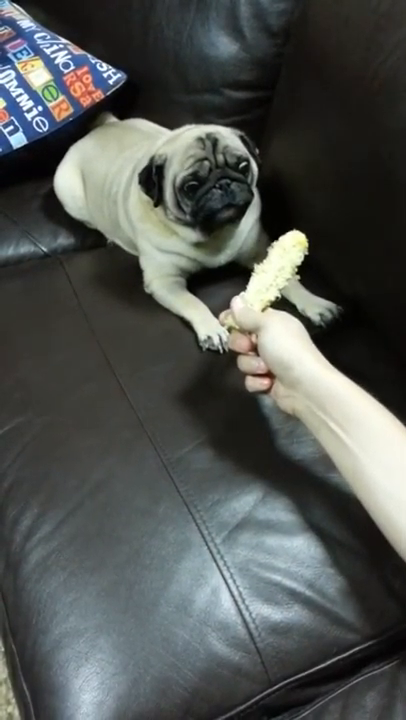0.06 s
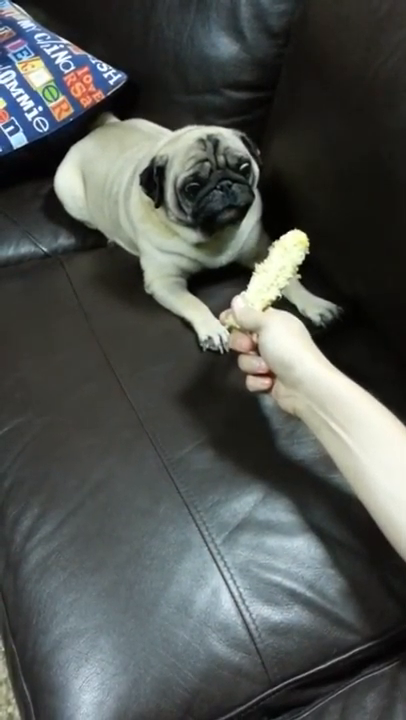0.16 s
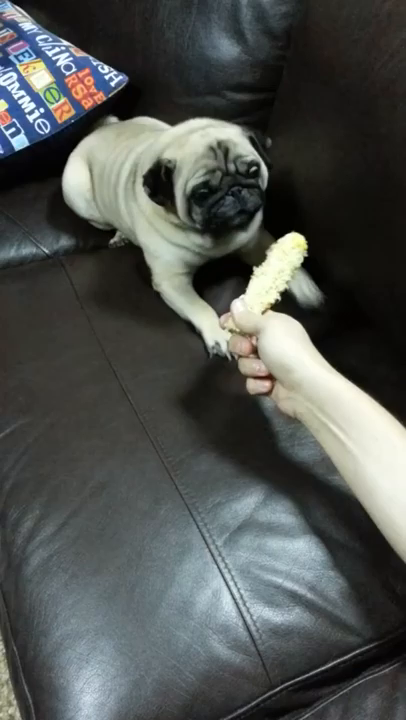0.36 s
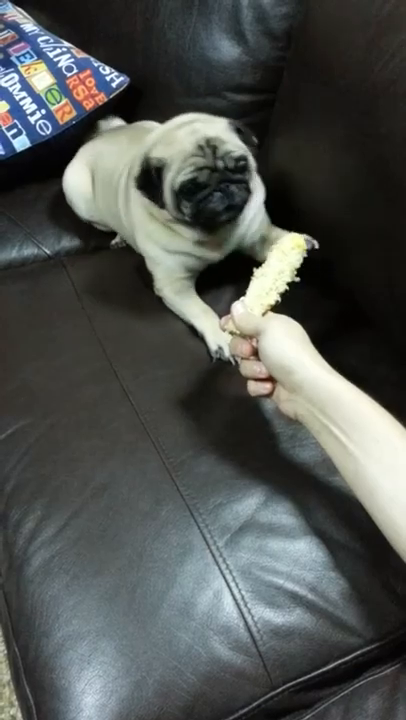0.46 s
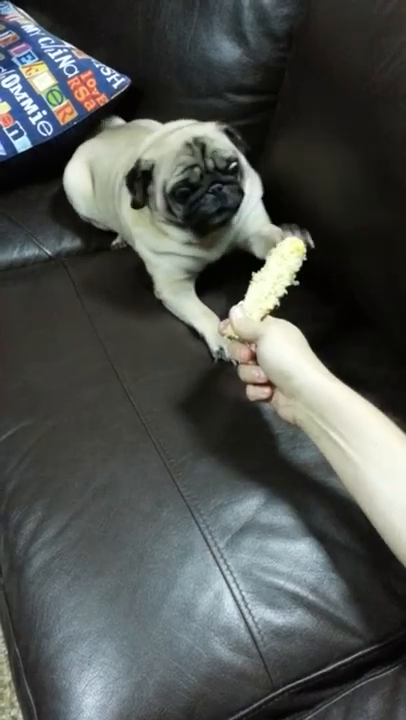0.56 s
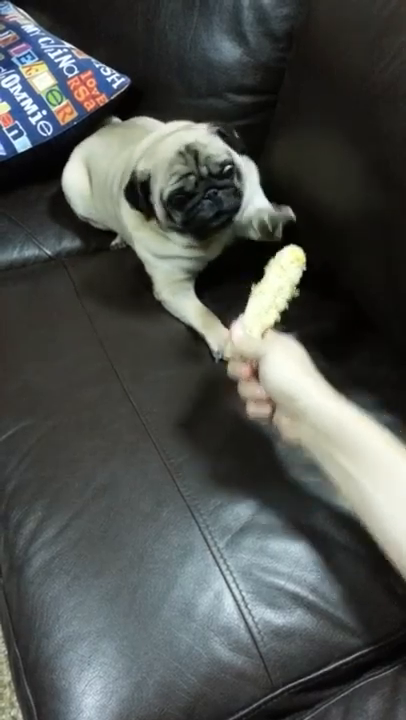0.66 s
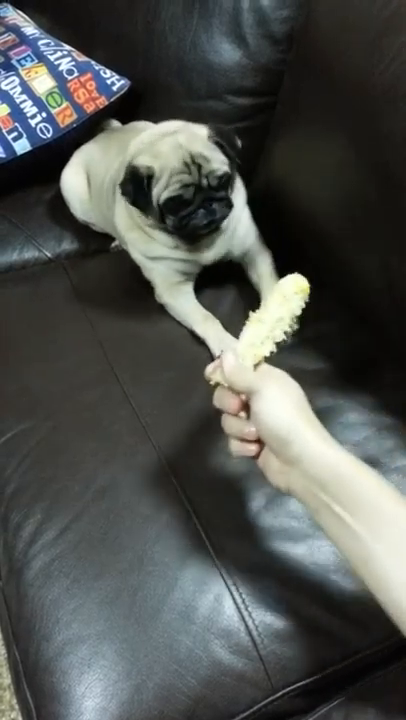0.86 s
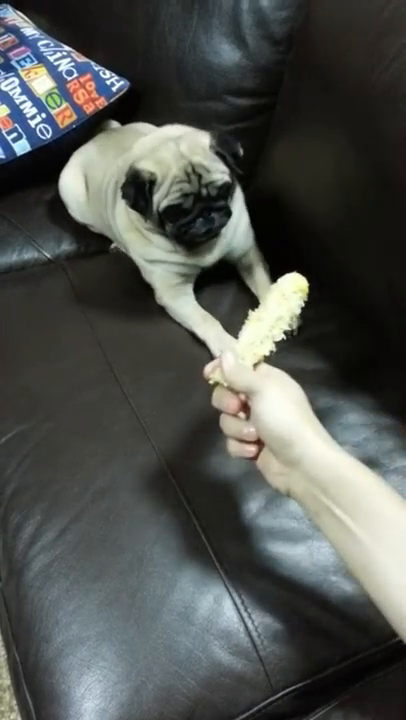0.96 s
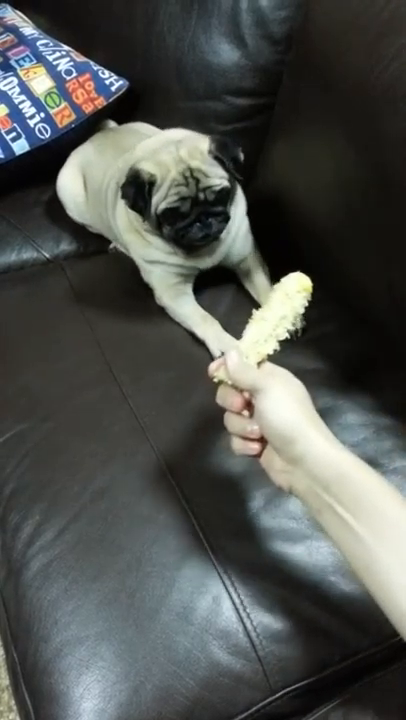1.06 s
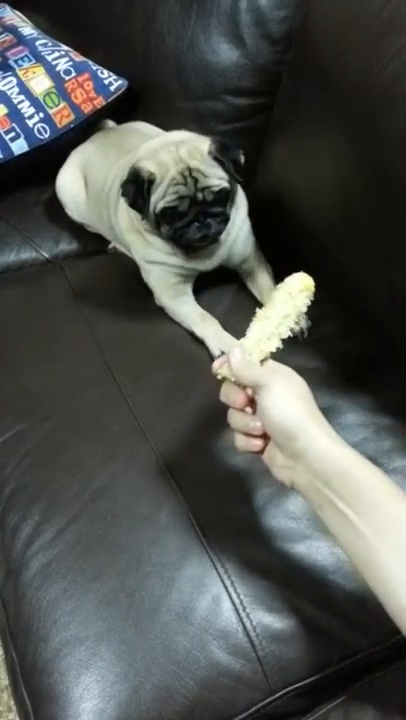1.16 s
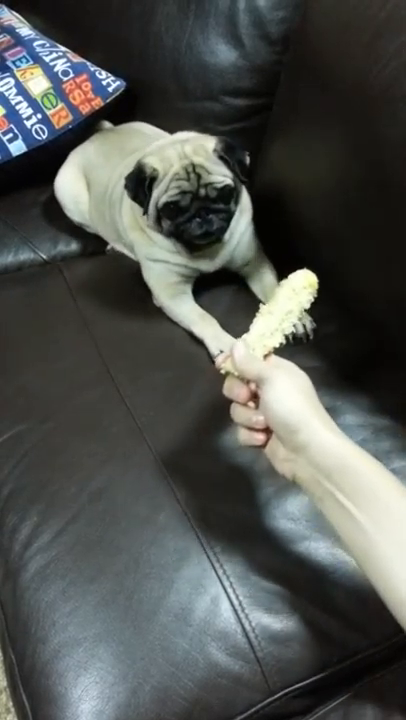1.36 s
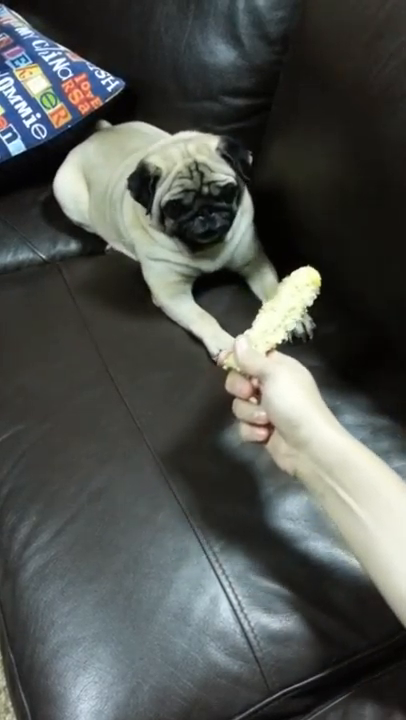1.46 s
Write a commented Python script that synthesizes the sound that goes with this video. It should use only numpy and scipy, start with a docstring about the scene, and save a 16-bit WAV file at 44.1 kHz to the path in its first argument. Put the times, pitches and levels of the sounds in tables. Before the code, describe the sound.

In a quiet room, a small dog gives one fluttering snort and huff that fades into a nasal rattle. Faint leather rustling, a soft paw thump, a light sniff and two tiny ticks are heard up close.

```python
"""A quiet living room, a stereo microphone close to a pug on a leather couch. The leather shifts,
then the dog snorts at a treat, its soft palate fluttering as the mouth opens. The snort breaks
into a breathy huff and trails off in a rattling snore through the nose. A paw thumps on the
cushion, the dog sniffs, the leather rustles and a small double tick ends it."""
import sys
import numpy as np
from scipy import signal
from scipy.fft import rfft, irfft
from scipy.io import wavfile
from scipy.ndimage import uniform_filter1d, map_coordinates

SR = 44100
rng = np.random.default_rng(int(sys.argv[2]) if len(sys.argv) > 2 else 0)


def store_pcm(level_fs):
    """Save levels as 16-bit WAV."""
    pcm = np.round(np.clip(level_fs, -1, 1) * 32767).astype(np.int16)
    wavfile.write(sys.argv[1], SR, np.atleast_2d(pcm).T)


N = 66150
T = np.arange(N) / SR

# Resonances of room tone, couch and ticks. Each row: centre in Hz, width in Hz, relative level in dB.
ROOM_TONE_BANDS = [(105, 140, -9.5), (400, 500, -7), (2000, 3500, -9), (6500, 3600, -12), (12500, 6900, -9)]
RUMBLE_BANDS = [(55, 50, -22.5), (104, 45, -2), (145, 110, 3), (290, 170, 1), (440, 260, 2),
                (700, 620, -5.5)]
RUSTLE_BANDS = [(1220, 340, -1.5), (2200, 1500, -5), (4100, 490, -2.5), (5700, 2100, -3),
                (7300, 2000, -1.5), (11400, 15000, -9)]
SCUFF_BANDS = [(3400, 1300, 9.5), (5030, 1700, 5.5), (7090, 900, -6.5)]
TICK_RING_BANDS = [(6850, 660, 8.5), (5700, 1540, -6)]
TICK_CRACK_BANDS = [(1390, 1200, -10), (4100, 3000, -5.5), (8400, 7200, -1.5), (13300, 1800, -0.5)]
# Leather shifting under the dog. Each row: time in seconds, rumble in dB, rustle in dB.
LEATHER_LEVELS = [(0, -53.5, -62.5), (.036, -63, -64), (.042, -47.5, -48.5), (.065, -51, -57.5),
                  (.1, -55.5, -59.5), (.135, -48, -57.5), (.165, -44, -55.5), (.27, -50, -51.5),
                  (.31, -60, -66), (.37, -45.5, -72), (.55, -54, -47), (.7, -51, -50.5), (.8, -53.5, -62.5),
                  (.88, -54.5, -67), (.9, -40.5, -48.5), (.93, -57.5, -62), (.975, -61, -71.5),
                  (1.05, -68.5, -82), (1.16, -65, -76), (1.23, -73.5, -90), (1.28, -78.5, -91),
                  (1.3, -68.5, -68), (1.325, -66, -72.5), (1.35, -75.5, -92), (1.39, -80.5, -93.5),
                  (1.41, -57, -61.5), (1.445, -69, -76.5), (1.48, -62.5, -74), (1.5, -75, -95.5)]
# Paws landing. Each row: start in seconds, level in dB, deep thud relative to that in dB.
PAW_HITS = [(.017, -38.5, -40), (0.0273, -44, -36), (0.156, -51.5, -9), (.2135, -53, -13),
            (0.8974, -32, 5.5), (.916, -36, -4)]
# Modes of the cushion and its leather skin. Each row: pitch in Hz, level in dB, T60 in seconds.
CUSHION_MODES = [(128, -4, .08), (175, -5.5, 0.081)]
HIDE_MODES = [(400, -2.5, 0.046), (574, 1.5, .016)]
# Claw scuffs and the hardest slaps of the palate. Each row: start in seconds, level in dB.
CLAW_SCUFFS = [(.039, -45), (.048, -56.5), (.8855, -36.5), (.8975, -47.5), (.918, -49)]
PALATE_SLAPS = [(.2195, -40.5), (.226, -33.5), (.2645, -14.5), (.283, -9.5), (.3095, -7.5), (.3365, -18.5),
                (.5075, -26), (.611, -34.5), (.674, -34.5)]
# Small hard ticks. Each row: start in seconds, ring in dB, peak of the crack in dB.
TICK_HITS = [(1.3973, -29, -57), (1.4049, -23.5, -22.5), (1.4085, -34, -40)]
# Airflow of the sniff. Each row: time in seconds, level in dB.
SNIFF_FLOW = [(.92, -110), (1.0, -72), (1.04, -66.5), (1.11, -59.5), (1.162, -57), (1.195, -70.5),
              (1.23, -98), (1.26, -120)]
# Airflow of the snore. Each row: time in seconds, then throat, nose and wheeze in dB.
SNORE_FLOW = [(.38, -110, -110, -110), (.48, -46.5, -36.5, -63), (.51, -46, -36, -72), (.57, -38, -37, -54),
              (.62, -41, -38, -58), (.662, -41, -43, -54), (.678, -36, -34, -53), (.724, -41, -36, -41),
              (.748, -40.5, -47, -55), (.815, -62, -64, -68), (.88, -63.5, -68, -62.5),
              (.97, -110, -110, -110)]
# Airflow of the huff. Each row: time in seconds, then throat, mouth and teeth in dB.
HUFF_FLOW = [(.28, -110, -110, -110), (.326, -33.5, -30, -25.5), (.338, -20.5, -17, -22.5),
             (.372, -26, -18.5, -21.5), (.395, -25.5, -27, -20.5), (.43, -36, -32.5, -33.5),
             (.465, -36, -37, -34.5), (.52, -45.5, -44.5, -44), (.6, -52.5, -51, -52.5),
             (.68, -64.5, -71, -51.5), (.8, -57, -91, -70), (.85, -80.5, -62.5, -58), (.9, -66, -70.5, -77),
             (.96, -110, -110, -110)]
# Airflow of the snort. Each row: time in seconds, then throat, mouth and nose in dB.
SNORT_FLOW = [(.12, -100, -110, -100), (.165, -56.5, -68, -57), (.215, -45.5, -62.5, -57),
              (.224, -35.5, -46.5, -38.5), (.248, -27.5, -38, -30), (.264, -21, -20, -24.5),
              (.286, -15.5, -20, -17), (.3, -23.5, -24.5, -19.5), (.314, -19.5, -20.5, -21),
              (.325, -30.5, -29.5, -34), (.35, -61.5, -55, -55.5), (.37, -110, -110, -110)]
# Hiss of the snore: resonances of the nose, then in the last row a faint high hiss from the microphone.
# Each row: centre in Hz, width in Hz, relative level in dB.
SNORE_HISS_BANDS = [(4464, 680, 3), (5000, 1600, -3.5), (7073, 460, -8), (7570, 2200, -16),
                    (9260, 2500, -19.5), (13700, 700, -32.5)]
# Other resonances of the dog's breath. Each row: centre in Hz, width in Hz, relative level in dB.
SNIFF_BANDS = [(614, 300, -9.5), (2200, 2200, -6.5), (4350, 600, -5), (4970, 1400, -1), (6930, 1900, 0),
               (9800, 5000, -9.5)]
SNORE_THROAT_BANDS = [(338, 84, -10), (570.7, 120, 2.5)]
WHEEZE_BANDS = [(980, 150, -0.18), (2200, 480, -0.82)]
HUFF_THROAT_BANDS = [(341, 220, -10), (580, 260, -9.5), (920, 370, 1.5)]
HUFF_MOUTH_BANDS = [(1828, 370, -3.5), (2340, 450, -5.5), (2943, 350, -4), (3576, 490, 1.5)]
TEETH_BANDS = [(4070, 850, 0.5), (5090, 350, -6), (5700, 400, -5), (6750, 650, -7), (7650, 900, -7.5),
               (8170, 2500, -15.5)]
SNORT_THROAT_BANDS = [(764, 300, 1), (1000, 200, -10.5), (329, 81, -14.5)]
SNORT_MOUTH_BANDS = [(2830, 380, 1), (2100, 2000, -9)]
SNORT_NOSE_BANDS = [(1360, 1800, -23), (3400, 300, -10.5), (4353, 700, -2), (5250, 390, -9),
                    (7020, 820, 1.5), (9300, 3300, -17.5)]
SLAP_BANDS = [(697, 300, -4.5), (3080, 400, -12.5), (4450, 700, 0.5), (7100, 900, -11)]
# The airway changing shape. Each row: time in seconds, factor on its resonances.
THROAT_TIGHTENING = [(.5, 0.89), (.57, 1.016), (.64, .96), (.7, 1.04), (.76, 1.14)]
MOUTH_SHAPING = [(.33, 0.97), (.355, 1.0), (.38, 0.95), (.41, 0.91), (.46, .92), (.56, .98)]
MOUTH_OPENING = [(.21, .66), (.245, 0.7), (.265, 0.87), (.286, 1.02), (.33, .99)]
# Close reflections off the couch. Each entry: delay in seconds.
COUCH_DELAYS = [.0007, .0017, .0031]
# Colour of the microphone ports. Each row: frequency in Hz, left minus right in dB.
PORT_BALANCE = [(70, -4), (300, -1.4), (520, 2.5), (780, 2), (1200, 1.5), (2300, 5.5), (3200, 5),
                (4300, 10.5), (5300, 8), (6100, 2.5), (7100, -9), (9000, -3.5), (14000, 4.5)]


def from_db(db):
    """Decibels to gain."""
    return 10 ** (np.asarray(db) / 20)


def levels(rows):
    """One gain curve for each dB column."""
    times, *columns = np.transpose(rows)
    return [from_db(np.interp(T, times, column)) for column in columns]


def low_cut(x, hz, order=2):
    """Roll off the bass."""
    return signal.sosfilt(signal.butter(order, hz, "high", fs=SR, output="sos"), x + 1e-18)


def resonate(x, bands):
    """Steep resonances in parallel, alternating in polarity."""
    out, power = 0, 0
    for k, (hz, width, db) in enumerate(bands):
        damping = np.pi * width / SR
        r = np.exp(-damping)
        gain = (1 - r * r) / 2
        section = [gain, 0, -gain, 1, -(1 + r * r) * np.cos(2 * np.pi * hz / SR), r * r]
        out += (-1) ** k * from_db(db) * signal.sosfilt([section] * 2, x + 1e-18) / np.sqrt(damping / 2)
        power += from_db(db) ** 2
    return out / np.sqrt(power)


def even(x):
    """Hold the short-term power steady, so that a gain curve alone sets the level."""
    return x / np.sqrt(uniform_filter1d(x ** 2, 640) + 1e-9)


def noise(bands, gate=1):
    """Gated noise through fixed resonances."""
    return even(resonate(gate * rng.standard_normal(N), bands))


def gliding_air(bands, gate, shape):
    """Gated turbulence through resonances that glide with the airway's shape."""
    clock = np.cumsum(np.interp(T, *np.transpose(shape)))
    count = int(clock[-1]) + 2
    turbulence = np.interp(np.arange(count), clock, gate) * rng.standard_normal(count)
    return even(map_coordinates(resonate(turbulence, bands), [clock], order=3))


def bursts(hits, bands, decay_s):
    """A brief dying burst of noise into resonances for each hit."""
    out = 0
    for start, db in hits:
        envelope = (T >= start) * np.exp(-abs(T - start) / decay_s)
        burst = resonate(envelope * rng.standard_normal(N), bands)
        out += from_db(db) * burst * np.linalg.norm(envelope) / np.linalg.norm(burst)
    return out


def room_tone():
    """Faint steady noise, separate in each channel."""
    return from_db(-74.5) * np.array([noise(ROOM_TONE_BANDS), noise(ROOM_TONE_BANDS)])


def room(x, wet_db, left_db, side_db, t60_s=.24):
    """Close reflections off the couch widen the sound; a short tail follows."""
    side = low_cut(x, 520, order=1)
    for lag_s in COUCH_DELAYS:
        allpass = np.r_[-.5, np.zeros(int(lag_s * SR)), 1]
        side = signal.lfilter(allpass, allpass[::-1], side)
    t = T[:SR // 2]
    tail = from_db(-60 * t / t60_s) * (t > sum(COUCH_DELAYS))
    echoes = low_cut(tail / np.linalg.norm(tail) * rng.standard_normal((2, len(t))), 200)
    wet = from_db(wet_db) * signal.fftconvolve(x[None], echoes, axes=1)[:, :N]
    left_right = np.array([[1], [-1]])
    return (x + left_right * from_db(side_db) * side + wet) * from_db(left_right * left_db / 2)


def knock(start, modes, low_hz):
    """Struck, damped modes; little is radiated below them."""
    age = np.maximum(T - start, 0)
    rings = sum(from_db(db - 60 * age / t60) * np.sin(2 * np.pi * hz * age) for hz, db, t60 in modes)
    return low_cut(rings, low_hz)


def couch(grain_db=2.5):
    """Grainy leather friction, paw thuds and claw scuffs."""
    rumble, rustle = levels(LEATHER_LEVELS)
    grains = from_db(grain_db * np.repeat(rng.exponential(1, N), 24)[:N])
    friction = rumble * noise(RUMBLE_BANDS) + rustle * noise(RUSTLE_BANDS, grains)
    thuds = 0
    for start, db, deep_db in PAW_HITS:
        deep = from_db(deep_db) * knock(start, CUSHION_MODES, low_hz=85)
        thuds += from_db(db) * (knock(start, HIDE_MODES, low_hz=223) + deep)
    return friction + thuds + bursts(CLAW_SCUFFS, SCUFF_BANDS, decay_s=.0065)


def ticks():
    """A light touch, a sharper one and its rebound: each a clean crack and a brief ring."""
    out = bursts(np.array(TICK_HITS)[:, :2], TICK_RING_BANDS, decay_s=.0007)
    for start, _, db in TICK_HITS:
        crack = resonate(signal.unit_impulse(N, int(start * SR)), TICK_CRACK_BANDS)
        out += from_db(db) * crack / abs(crack).max()
    return out


def sniff():
    """A soft breath drawn through the nose."""
    return levels(SNIFF_FLOW)[0] * noise(SNIFF_BANDS)


def palate_flutter(rate_hz=132, jitter=.17, spread_db=2.5, decay_s=.0017):
    """Uneven flaps of the soft palate, each a sudden puff that dies away."""
    timing, strength = rng.standard_normal((400, 2)).T
    starts = np.cumsum(np.exp(jitter * timing)) / rate_hz
    starts -= starts[0]
    flap = np.searchsorted(starts, T, side="right") - 1
    return from_db(spread_db * strength[flap]) * np.exp(-(T - starts[flap]) / decay_s)


def snore(puffs, steady_air=.15):
    """Separate puffs rattle through the short nose and end in a wheeze as the throat tightens."""
    throat, nose, wheeze = levels(SNORE_FLOW)
    gate = puffs + steady_air
    return (throat * gliding_air(SNORE_THROAT_BANDS, gate, THROAT_TIGHTENING)
            + nose * noise(SNORE_HISS_BANDS, gate)
            + wheeze * noise(WHEEZE_BANDS, gate))


def huff(puffs, steady_air=.74):
    """Nearly smooth air through the open mouth and past the teeth."""
    throat, mouth, teeth = levels(HUFF_FLOW)
    gate = puffs + steady_air
    return (throat * noise(HUFF_THROAT_BANDS, gate)
            + mouth * gliding_air(HUFF_MOUTH_BANDS, gate, MOUTH_SHAPING)
            + teeth * noise(TEETH_BANDS, gate))


def snort(puffs, steady_air=.95):
    """A fluttering blast whose throat and mouth resonances rise as the mouth opens."""
    throat, mouth, nose = levels(SNORT_FLOW)
    gate = puffs + steady_air
    return (throat * gliding_air(SNORT_THROAT_BANDS, gate, MOUTH_OPENING)
            + mouth * gliding_air(SNORT_MOUTH_BANDS, gate, MOUTH_OPENING)
            + nose * noise(SNORT_NOSE_BANDS, gate))


def scene():
    """Dog, couch and ticks close to the microphone, over the living room's tone."""
    puffs = palate_flutter()
    snort_and_slaps = snort(puffs) + bursts(PALATE_SLAPS, SLAP_BANDS, decay_s=.0017)
    mix = room(snort_and_slaps, wet_db=-9.7, left_db=.46, side_db=-2.5)
    mix += room(huff(puffs), wet_db=-8.5, left_db=-1.6, side_db=-2)
    mix += room(snore(puffs) + sniff(), wet_db=-9.6, left_db=-.45, side_db=-2.5)
    mix += room_tone()
    mix += room(couch(), wet_db=-11.5, left_db=.55, side_db=-3)
    return mix + room(ticks(), wet_db=-18.5, left_db=.5, side_db=-5)


def record(dry, ceiling=.92, cutoff_hz=14750):
    """Each microphone port has its own colour; peaks are rounded and the top is cut."""
    hz, db = np.transpose(PORT_BALANCE)
    tilt_db = np.interp(np.log(np.fft.rfftfreq(2 * N, 1 / SR) + 1), np.log(hz), db)
    ports = from_db([tilt_db / 2, -tilt_db / 2])
    ports /= np.sqrt(np.mean(ports ** 2, axis=0))
    coloured = irfft(rfft(dry, 2 * N) * ports)[:, :N]
    rounded = coloured / (1 + (coloured / ceiling) ** 6) ** (1 / 6)
    return signal.sosfilt(signal.ellip(10, .1, 100, cutoff_hz, fs=SR, output="sos"), rounded)


dry = scene()
out = record(dry)
store_pcm(out)
```